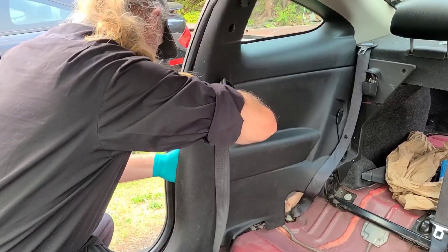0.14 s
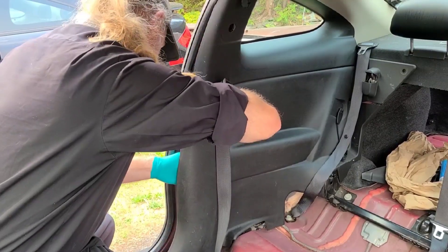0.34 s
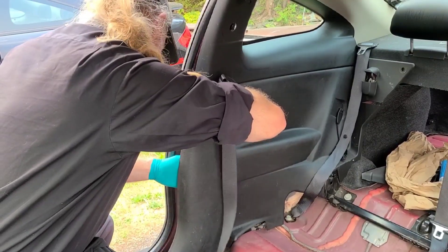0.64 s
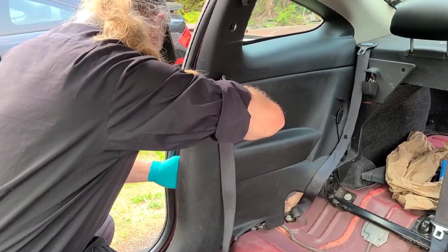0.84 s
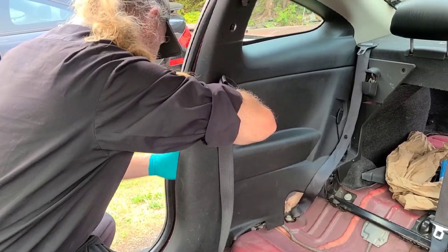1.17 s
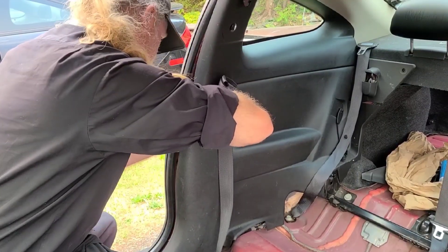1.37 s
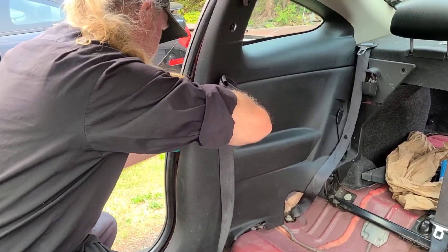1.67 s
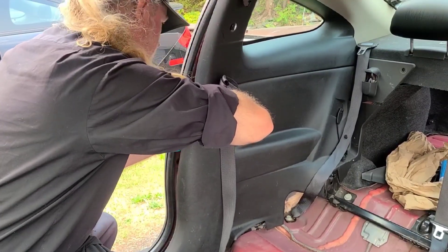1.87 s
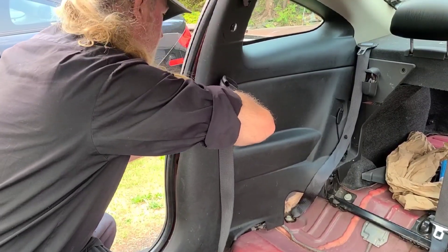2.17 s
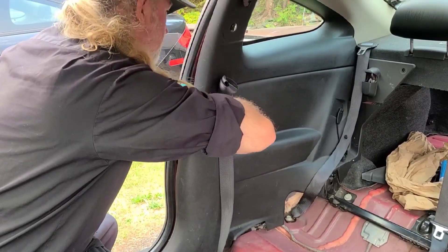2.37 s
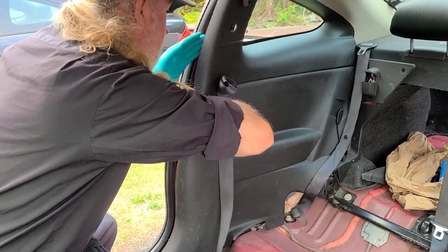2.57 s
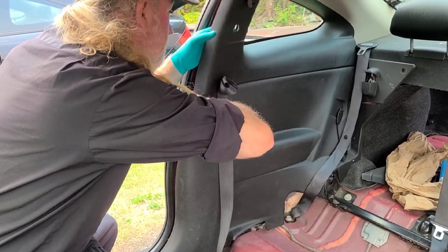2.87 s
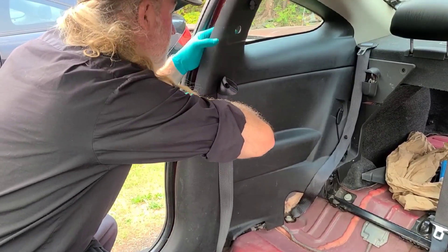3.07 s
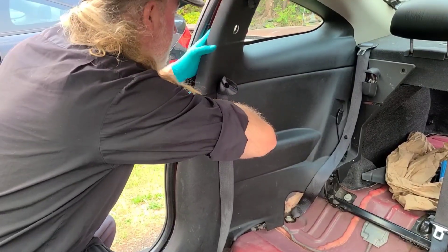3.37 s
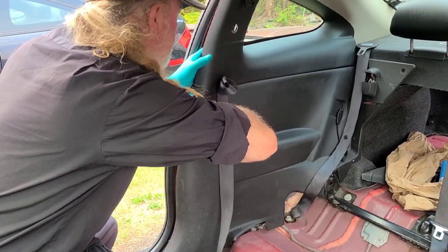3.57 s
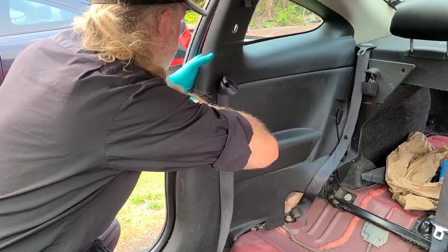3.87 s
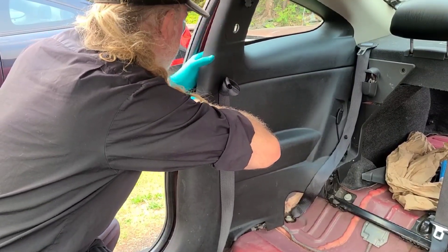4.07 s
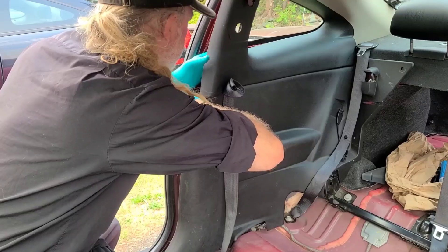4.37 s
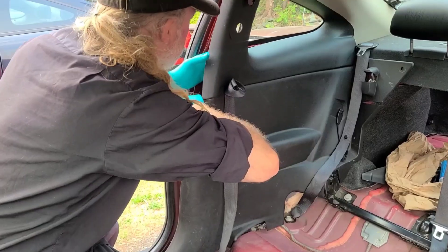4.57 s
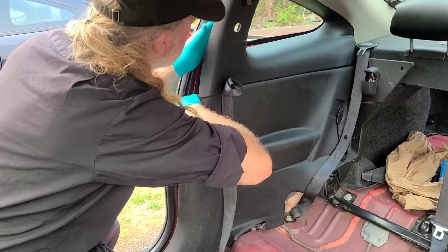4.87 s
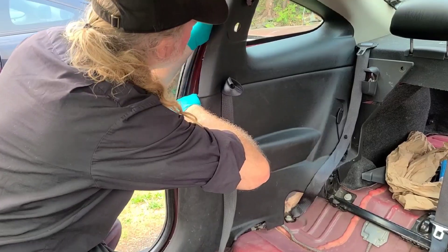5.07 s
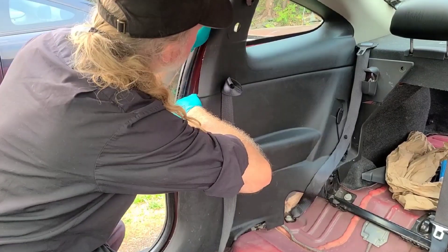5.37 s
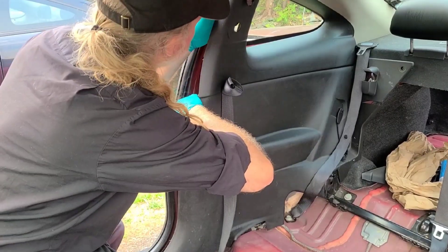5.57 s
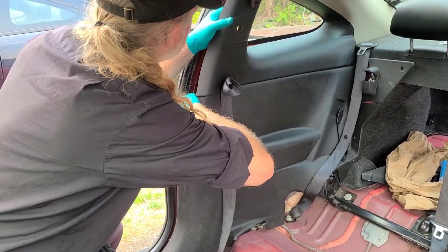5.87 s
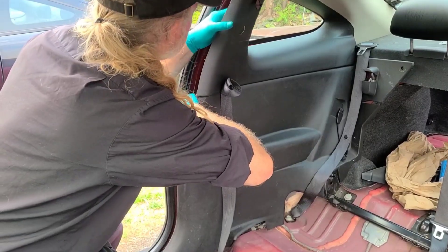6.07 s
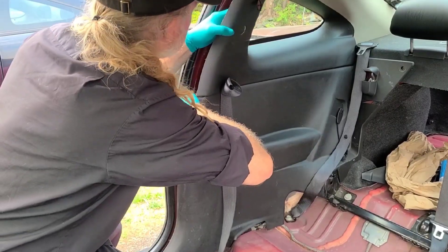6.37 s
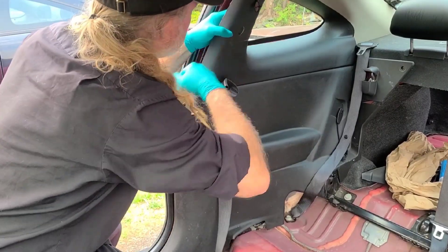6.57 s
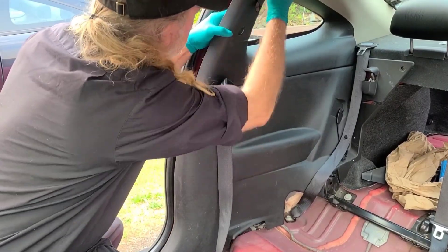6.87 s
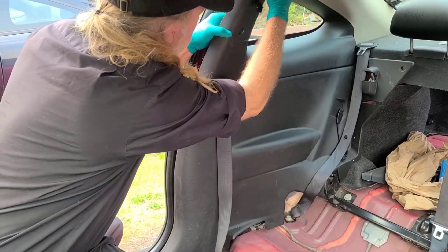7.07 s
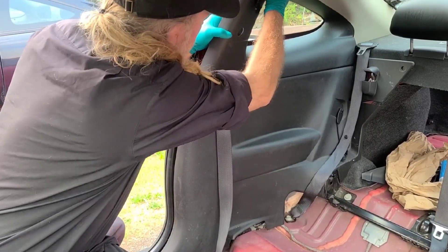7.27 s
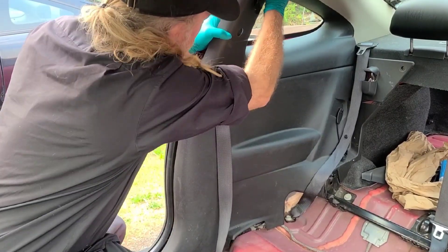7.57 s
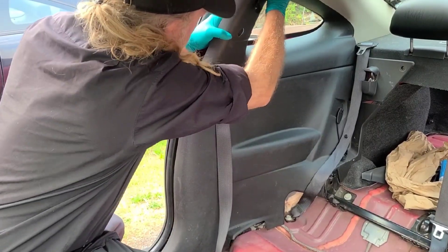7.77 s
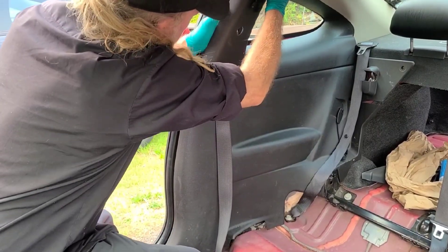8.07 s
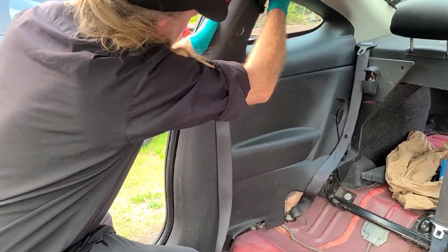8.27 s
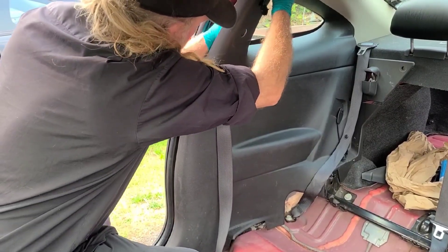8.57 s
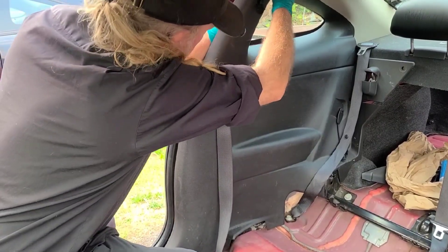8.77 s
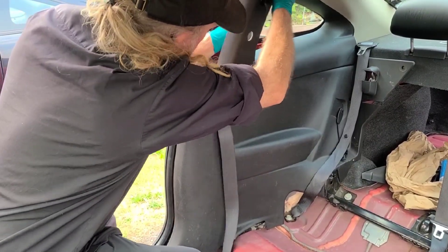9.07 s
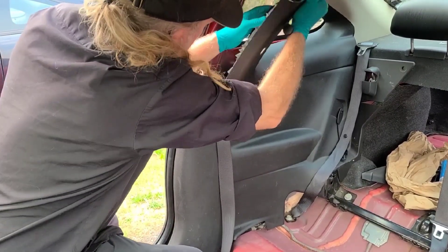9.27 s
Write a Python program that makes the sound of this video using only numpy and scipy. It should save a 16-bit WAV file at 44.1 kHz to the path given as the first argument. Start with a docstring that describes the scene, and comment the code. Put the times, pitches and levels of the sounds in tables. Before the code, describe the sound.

Inside a parked car with the door open, gloved hands pull at a plastic trim panel, heard nearby in stereo. Soft, grainy rubbing of gloves and sleeves comes and goes throughout. At about 0.7 seconds a loud double snap makes the car body boom briefly. Faint ticks follow, then a run of light clicks and knocks from 3 to 4 seconds. Another loud, sharp snap with a low thump lands at 4.3 seconds. Small clicks continue, with a firmer knock at 6 seconds and lighter ones around 6.6 and 8.2 seconds. From about 8.9 to 9.3 seconds the clips release in a fast, loud rattle of cracks and hollow knocks over a low boom. Distant traffic rumbles quietly the whole time, and a very faint bird gives a short rising whistle four times between 2.7 and 8 seconds.

```python
"""Inside a parked car with the door open, gloved hands pull a plastic trim panel off its clips.
Each snap of a clip or knock of the panel is an impulse that rings the trim's damped resonances;
hard pulls set the low modes of the body shell booming. Gloves and sleeves rub on the plastic,
making friction noise. Far traffic rumbles and a bird whistles outside. The two ports of a stereo
microphone hear the bass alike and the treble differently."""
import sys
import numpy as np
from scipy import signal
from scipy.fft import rfft, irfft, next_fast_len
from scipy.io import wavfile
from scipy.ndimage import map_coordinates

SR = 44100
rng = np.random.default_rng(int(sys.argv[2]) if len(sys.argv) > 2 else 0)


def to_wav(s):
    """Save 16-bit WAV."""
    ch = np.atleast_2d(s).T  # columns
    pcm = np.round(np.clip(ch, -1, 1) * 32767)  # PCM
    wavfile.write(sys.argv[1], SR, pcm.astype(np.int16))


N = 415422

# Resonances of the plastic trim. Each row: centre in Hz, nominal width in Hz, lift in dB.
TRIM_MODES = [(306.9, 80, 2), (432, 44, 6), (628, 34, 6), (743, 45, 4.5), (1010, 89, 5.5), (1265, 33, 7),
              (1720.5, 11, 10), (2080, 170, 3), (2983, 110, 3), (3190, 87, 1), (4250, 250, 2),
              (5100, 220, 1.5)]
# Top treble of snaps and strokes. Each row: frequency in Hz, relative spectral density in dB.
SIZZLE_SPECTRUM = [(6500, -41), (8300, 0.5), (12000, 0), (15500, -3.5)]


def amp(db):
    """The decibel scale: the amplitude ratio of a level."""
    return 10 ** (np.asarray(db) / 20)


def unit(x):
    """Normalisation: x at an rms of 1."""
    return x / np.sqrt(np.mean(x ** 2) + 1e-20)


def along(points, hz):
    """Interpolation of (Hz, value) points on a logarithmic frequency axis."""
    freqs, values = np.transpose(points)
    return np.interp(np.log(hz + 1), np.log(freqs + 1), values)


def curves(rows):
    """Linear interpolation in time: one value per sample for each column after the first."""
    times, *columns = np.transpose(rows)
    return [np.interp(np.arange(N) / SR, times, column) for column in columns]


def wobble(rate):
    """Random modulation: a smooth curve through `rate` Gaussian knots a second."""
    knots = rng.standard_normal(int(N * rate / SR) + 4)
    return map_coordinates(knots, [np.arange(N) * rate / SR])


def filtered(x, response):
    """Linear filtering: the spectrum of x times a frequency response."""
    size = next_fast_len(x.shape[-1] + 8192)
    return irfft(rfft(x, size) * response(np.fft.rfftfreq(size, 1 / SR)), size)[..., :x.shape[-1]]


def ports(hz):
    """Partial coherence: the right port hears the left's sound phase-shifted, plus scattered sound."""
    # Each row: frequency in Hz, coherence of left and right from 0 to 1.
    coherence = [(60, .999), (150, 0.92), (380, 0.9), (700, 0.78), (1300, 0.66), (3000, 0.82), (6000, 0.38),
                 (12000, 0.53)]
    # Each row: frequency in Hz, level of left over right in dB.
    balance = [(100, -1), (1000, 0), (2400, -1), (5500, -1), (9000, -6), (15000, -5)]
    # Each row: frequency in Hz, phase lead of the left in radians.
    phase_lead = [(40, 0.44), (250, 0.39), (500, 0.88), (700, -0.88), (1300, -1.4), (4000, -1.4)]
    alike = np.clip(along(coherence, hz), 0, 1)
    left, right = amp(along(balance, hz) * [[.5], [-.5]])
    shared = right * alike * np.exp(-1j * along(phase_lead, hz))
    return np.array([left, shared, right * np.sqrt(1 - alike ** 2)])


def noise(spectrum, resonances=()):
    """Spectral shaping: stereo noise of rms 1 as the two ports hear it, lifted at resonances."""
    bands = next_fast_len(N // 16 + SR // 60)
    hz = np.linspace(0, SR / 2, bands)
    lift_db = sum(db / (1 + ((hz - centre) / (0.91 * width)) ** 2) for centre, width, db in resonances)
    left, shared, own = np.repeat(amp(along(spectrum, hz) + lift_db) * ports(hz), 8, axis=1)
    common, scattered = rng.standard_normal((2, 8 * bands)) + 1j * rng.standard_normal((2, 8 * bands))
    return unit(irfft(np.array([left * common, shared * common + own * scattered]), 16 * bands))


def bandpass(x, hz, q):
    """A second-order resonator passes a band of width hz / q."""
    return signal.lfilter(*signal.iirpeak(hz, q, SR), x)


def ringing(x, hz, q, scatter=1.3):
    """Forced resonance: x plus a mode at hz and three narrower ones at random pitches around it."""
    out = .45 * x + 2.1 * bandpass(x, hz, q)
    for octaves in rng.uniform(-.9, .45, size=3):
        out += scatter * bandpass(x, hz * 2 ** octaves, q=16)
    return out


def traffic():
    """Ambient noise: the rumble and drone of far roads and the outdoor hush, each wavering slowly."""
    # Each row: time in seconds, base levels of rumble and drone in dB.
    road_levels = [(0.0, -43.5, -54), (0.77, -43.5, -49.5), (1.48, -47, -56.5), (4.31, -45, -52),
                   (5.24, -47, -54), (7.87, -46.5, -51), (9.0, -43.5, -57)]
    # Three spectra. Each row: frequency in Hz, relative spectral density in dB.
    rumble_spectrum = [(12, -46.5), (20, -21), (35, -2.5), (54, 2.5), (71, -0.5), (97, -12.5), (130, -14.5),
                       (170, -39), (290, -120)]
    drone_spectrum = [(59, -36), (100, 10.5), (232, 0.5), (313, -9), (377, -5.5), (420, -11.5),
                      (550, -37.5), (920, -120)]
    hush_spectrum = [(900, -21.5), (1500, -1), (5000, -2.5), (7200, -8), (8300, -26), (12000, -14),
                     (15500, -22)]
    rumble_db, drone_db = curves(road_levels)
    rumble = amp(rumble_db + 1 + 2.0 * wobble(4.5)) * noise(rumble_spectrum)[:, :N]
    hush = amp(-75.5 + 2.5 * wobble(4)) * noise(hush_spectrum)[:, :N]
    drone = amp(drone_db - 0.5 + 1.5 * wobble(3.6)) * noise(drone_spectrum)[:, :N]
    return rumble + hush + drone


def bird():
    """Frequency and amplitude modulation: a repeated call of fluttering glides, nearer the left port."""
    # Each row: start in seconds, base level in dB.
    calls = [(2.7, -73), (4.3, -68), (6.5, -68), (7.94, -67)]
    # Overlapping notes of a call. Each row: delay and length in seconds, start and end pitch in Hz,
    # exponent of the glide, relative level in dB.
    notes = [(0, 0.11, 3896, 4500, 1, -2), (0.06, .17, 2850, 4480, 1.5, 2), (.125, .05, 4000, 4500, 1, -6)]
    out, flutter = np.zeros(N), 3.2 * wobble(70)
    for start, call_db in calls:
        for delay, length, start_hz, end_hz, bend, note_db in notes:
            at, count = round((start + delay) * SR), round(length * SR)
            glide = np.linspace(0, 1, count) ** bend
            hz = start_hz + (end_hz - start_hz) * glide + 14 * flutter[at - 900:][:count]
            gain = amp(call_db + note_db + flutter[at:][:count])
            swell = np.abs(np.sin(np.pi * glide)) ** .5
            out[at:][:count] += gain * swell * np.sin(2 * np.pi * np.cumsum(hz) / SR)
    return out * amp([[.7], [-.7]])


def rubbing():
    """Sliding friction: gloves and cloth drag over the panel in grainy swells, above a dull scrape."""
    # Each row: start and length in seconds, base level in dB, relative fizz in dB, pitch in Hz.
    strokes = [(-.03, 0.22, -60, -17, 3020), (0.186, 0.15, -58, -18, 2970),
               (.685, .035, -48.5, -25.5, 2584), (0.725, 0.19, -54.5, -16, 1760),
               (0.987, .11, -62, -32, 2220), (1.189, 0.27, -62.5, -5.5, 3300),
               (1.515, 0.091, -70, -20, 3130), (1.616, 0.15, -60.5, -17, 3140),
               (1.72, 0.14, -59, -23, 2150), (1.875, 0.087, -66, -20, 2210), (2.221, 0.12, -53, -15, 2200),
               (2.312, 0.2, -66.5, -7, 2100), (2.499, 0.045, -67, -26, 1880),
               (2.714, 0.22, -52.5, -14.5, 3120), (2.907, 0.11, -56.5, -19, 2560),
               (3.437, .23, -52.5, -17, 3000), (3.775, 0.035, -46, -14, 4500),
               (3.647, 0.079, -52, -14, 3060), (3.898, .13, -70.5, -21, 2180),
               (4.249, 0.057, -46, -29.5, 4053), (4.784, .07, -62, -9, 2600),
               (4.855, 0.37, -66.5, -7, 3700), (5.065, 0.14, -54.5, -15.5, 2680),
               (5.239, 0.11, -58, -24, 2650), (5.512, 0.12, -62, -19, 3050),
               (5.611, 0.08, -62.5, -18, 2000), (5.753, 0.11, -55, -17, 3060),
               (5.848, 0.12, -63.5, -18, 3020), (6.199, .2, -75.5, -15, 1990),
               (6.522, .16, -52.5, -13.5, 3000), (6.689, 0.045, -72, -21, 2430),
               (6.842, 0.05, -74, -14, 4510), (6.946, 0.14, -63.5, -12, 3340),
               (7.083, 0.23, -51, -15, 3100), (7.307, 0.12, -55, -15.5, 3270),
               (7.601, 0.11, -61.5, -21, 2500), (7.868, .39, -63, -19.5, 3130),
               (8.16, 0.15, -59, -14, 3100), (8.293, 0.131, -73, -15, 2550),
               (8.513, 0.22, -51.5, -15.5, 2800), (8.748, 0.14, -52, -19, 3240)]
    # Course of the continuous scrape. Each row: time in seconds, level in dB.
    drag_levels = [(0, -61), (.33, -55), (.67, -61.5), (1.28, -68), (2.58, -65.5), (3.27, -55), (3.4, -62),
                   (3.51, -52.5), (4.23, -65.5), (4.42, -57), (4.6, -64.5), (6.02, -58.5), (6.12, -60),
                   (6.88, -67), (7.26, -57), (8.56, -63.5), (9, -53.5)]
    # Two friction spectra. Each row: frequency in Hz, relative spectral density in dB.
    rustle_spectrum = [(800, -27), (1300, 2.5), (2100, -5), (3200, -9.5), (4500, -7), (7200, -8),
                       (8200, -37.5)]
    scrape_spectrum = [(150, -31.5), (300, 1.5), (600, -3.5), (1300, -12.5), (2400, -37.5)]
    out = amp(curves(drag_levels)[0] + 1.1 * wobble(15)) * noise(scrape_spectrum)[:, :N]
    grain = amp(2.5 * wobble(150) + 2.5 * wobble(28))
    rustle = grain * noise(rustle_spectrum, TRIM_MODES)[:, :N]
    fizz = grain * noise(SIZZLE_SPECTRUM)[:, :N]
    scrape = grain * noise(scrape_spectrum, TRIM_MODES)[:, :N]
    for start, length, level_db, fizz_db, hz in strokes:
        now = np.arange(max(round(start * SR), 0), round((start + length) * SR))
        swell = np.abs(np.sin(np.pi * (now / SR - start) / length)) ** 1.1
        pitched = ringing(rustle[:, now], hz, q=5.1, scatter=0.53)
        layers = pitched + amp(fizz_db) * fizz[:, now] + amp(-3) * scrape[:, now]
        out[:, now] += amp(level_db) * swell * layers
    return out


def body_shell():
    """Modal superposition: hard pulls set the shell booming, each mode at a new strength and sign."""
    # Each row: frequency in Hz, relative level in dB, 60 dB decay time in seconds.
    shell_modes = [(49.3, -2.5, 0.94), (58, -1.5, 0.41), (78.77, -2.5, 0.77), (115, -6.5, .3),
                   (139.4, -5.5, .3), (164.3, -5.5, 0.52), (246, -8, 0.16), (309.6, -4.5, 0.24),
                   (373, -11, .2)]
    # Each row: start in seconds, drive in dB of the modes below 100 Hz and of those above.
    blows = [(.712, -17, -16), (0.75, -39.5, -17.5), (2.43, -40, -36.5), (2.772, -44, -50),
             (3.305, -37, -43), (3.359, -47, -39), (3.798, -51.5, -31), (4.277, -24, -16.5),
             (4.317, -20.5, -12.5), (6.041, -47, -30), (7.148, -36.5, -41), (8.164, -36.5, -41),
             (9.033, -19, -19), (9.069, -19, -30.5), (9.098, -22, -33), (9.156, -24, -31.5),
             (9.249, -22.5, -16), (9.301, -31, -22), (9.347, -24, -21)]
    out, t = np.zeros(N + SR), np.arange(SR * 2 // 3) / SR
    hz, level_db, t60 = np.transpose(shell_modes)[:, :, None]
    modes = amp(level_db - 60 * t / t60) * np.sin(2 * np.pi * hz * t) * (1 - np.exp(-t / 0.015))
    count = len(modes)
    for start, deep_db, upper_db in blows:
        strength = amp(2.5 * rng.standard_normal(count)) * rng.choice([-1, 1], count)
        # each mode's ring wavers at random in level, so the boom sounds rough
        knots = rng.standard_normal((count, 30))
        waver_db = 3.5 * np.array([map_coordinates(row, [t * 25]) for row in knots])
        drive = strength * amp(np.where(hz[:, 0] < 100, deep_db, upper_db))
        out[round(start * SR):][:len(t)] += drive @ (modes * amp(waver_db))
    return out[:N]


def fade(t, t60, rise_s=0.0012, hold_s=0.0046):
    """Damping: a quick rise, a brief hold, then an exponential fall of 60 dB in t60 seconds."""
    return (1 - np.exp(-t / rise_s)) ** 2 * amp(-60 * np.maximum(t - hold_s, 0) / t60)


def trim_panel():
    """Impact excitation: each snap or knock chatters and dies away, the treble first, the thud last."""
    # Each row: start in seconds, base level in dB, relative gains of thud, crack and sizzle in dB,
    # pitches of clack and crack in Hz.
    impacts = [(0.408, -42, -3.5, -33, -37, 550, 2950), (0.707, -11, -4.5, -2.5, -31, 2210, 2950),
               (0.723, -5.5, -11, -19, -30.5, 946, 3200), (0.816, -38.5, 1, -5.5, -3.5, 536, 3900),
               (0.838, -50.5, 0.5, 1, -16, 1540, 3020), (0.906, -49, -4, -16, -42, 784, 2640),
               (0.934, -41, -18, -17.5, -43, 680, 4800), (1.424, -53, -1, -10, -16, 1840, 4100),
               (1.768, -53.5, 5, -16, -35, 616, 3380), (2.241, -48, -4, -1.5, -9, 1880, 3620),
               (2.33, -44, -1.5, -6.5, -21, 1880, 4440), (2.365, -41, -15, -11.5, -19, 575, 3750),
               (2.961, -37, -4, -18, -31, 910, 3270), (3.09, -47, -18, -4.5, -13, 1590, 3600),
               (3.194, -36.5, -17, -16, -34, 830, 4570), (3.298, -23.5, -7, -10.5, -44, 697, 3320),
               (3.327, -45.5, 1, -3.5, -4.5, 700, 3360), (3.347, -34.5, -3.5, -30, -40, 620, 3450),
               (3.521, -34.5, -12.5, -22, -31, 960, 2970), (3.548, -40.5, -1.5, -17, -36, 750, 4850),
               (3.606, -38, -2.5, -15.5, -33, 675, 2900), (3.717, -36.5, -4, -2.5, -18, 1870, 3200),
               (3.787, -27.5, -7, -12, -22.5, 600, 3090), (4.131, -44, 0, -38, -43, 614, 2900),
               (4.192, -53, -0.5, -9.5, -31, 608, 2500), (4.279, -1.5, -8, -13, -31, 760, 3720),
               (4.459, -47, -1, -18.5, -44.5, 915, 3610), (4.482, -49, 0, -10.5, -39.5, 560, 4140),
               (4.747, -37, -4.5, -21.5, -40, 568, 3650), (4.825, -47, -6.5, -13, -24, 663, 2550),
               (4.851, -36, -1, -20.5, -29, 603, 3280), (5.035, -33, -3, -29.5, -41, 630, 2610),
               (5.058, -56.5, 4, -0.5, -24, 570, 3260), (5.136, -38.5, -5, -5, -23, 1760, 2650),
               (5.152, -38, -7, -15, -33, 1530, 2680), (5.946, -42.5, -9.5, -12, -31, 910, 3130),
               (6.037, -14.5, -13.5, -19.5, -62, 730, 3250), (6.563, -23.5, -17, -13, -26.5, 1340, 4030),
               (6.593, -31, -0.5, -12.5, -32, 767, 2780), (6.979, -43.5, -1.5, -18, -35, 1930, 2590),
               (7.518, -41.5, -21, -26, -42, 1330, 2690), (7.641, -39.5, -3, -21, -37, 649, 3870),
               (7.793, -43.5, -8.5, -16, -39, 654, 3060), (8.029, -34, -8, -22, -43, 1270, 2650),
               (8.074, -51, -9, -0.5, -14, 596, 4550), (8.157, -26.5, -13.5, -29, -54, 620, 2800),
               (8.19, -35.5, -23, -15, -34, 1270, 3400), (8.221, -53, -7.5, 0.5, -7, 1110, 3920),
               (8.8, -45.5, -8, -5, -12.5, 680, 3270), (8.837, -43.5, -9, 1, -2.5, 1680, 2430),
               (8.922, -39.5, -12, -14, -27, 1030, 3760), (8.933, -24.5, -12, -16, -29, 523, 2380),
               (9.031, -16.5, -5, -18.5, -44, 575, 2620), (9.063, -19, -3, -12.5, -27, 587, 3870),
               (9.094, -8, -14, -19.5, -40, 740, 2900), (9.113, -13.5, -9, -9, -18, 565, 2540),
               (9.148, -25, -6, -5, -27, 577, 4130), (9.202, -23.5, -7, -9, -20, 590, 3000),
               (9.219, -28.5, -5, -4, -28, 958, 3970), (9.249, -2, -18.5, -19, -32, 935, 2900),
               (9.268, -24, 1, -16, -27, 579, 2580), (9.297, -10, -11, -12, -19.5, 552, 3300),
               (9.305, -12, -5.5, -6.5, -39, 590, 3000)]
    # Three impact spectra. Each row: frequency in Hz, relative spectral density in dB.
    thud_spectrum = [(60, -30.5), (130, 6.5), (240, 3), (400, 0.5), (560, -5), (1100, -42)]
    clack_spectrum = [(200, -45.5), (450, -3), (700, -6.5), (1500, -1), (2500, -7.5), (5000, -48.5)]
    crack_spectrum = [(1200, -36), (2500, -7.5), (3000, -5.5), (4200, -3.5), (5500, -4.5), (7300, -2.5),
                      (8200, -36.5)]
    out, t = np.zeros((2, N + SR)), np.arange(SR // 4) / SR
    thud_noise = noise(thud_spectrum, TRIM_MODES)
    clack_noise = noise(clack_spectrum, TRIM_MODES)
    crack_noise = noise(crack_spectrum, TRIM_MODES)
    sizzle_noise = noise(SIZZLE_SPECTRUM)
    for start, level_db, thud_db, crack_db, sizzle_db, clack_hz, crack_hz in impacts:
        now = slice(round(start * SR), round(start * SR) + len(t))
        chatter = amp(2.0 * map_coordinates(rng.standard_normal(200), [t * 600]) * np.exp(-t / 0.12))
        # the spot that was struck rings around its own pitches
        clack = amp(-6) * ringing(clack_noise[:, now], clack_hz, q=9.9) * fade(t, t60=0.1196)
        bright_ring = ringing(crack_noise[:, now], crack_hz, q=4.4, scatter=.9)
        crack = amp(crack_db) * unit(bandpass(bright_ring, crack_hz, q=1.1))
        sizzle = amp(sizzle_db) * sizzle_noise[:, now] * (1 - np.exp(-t / .004))
        treble = (crack + sizzle) * fade(t, t60=0.1092)
        thud = amp(thud_db) * thud_noise[:, now] * fade(t, t60=0.18265)
        out[:, now] += amp(level_db) * (chatter * (clack + treble) + thud)
    return out[:, :N]


def scene():
    """Superposition: the pressures of all sources add."""
    return trim_panel() + body_shell() + rubbing() + traffic() + bird()


def record(dry):
    """Soft saturation rounds the loudest peaks; a low-pass filter limits the band."""
    ceiling, stop_hz, taper_hz = .9, 16000, 500
    rounded = dry / (1 + np.abs(dry / ceiling) ** 4) ** (1 / 4)
    return filtered(rounded, lambda hz: np.clip((stop_hz - hz) / taper_hz, 0, 1) ** 2)


dry = scene()
out = record(dry)
to_wav(out)
```